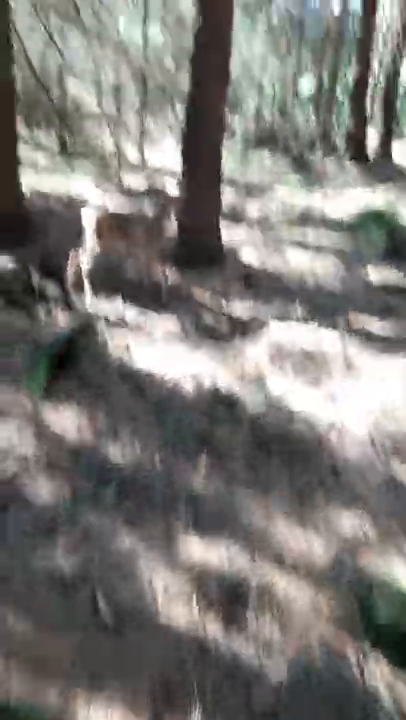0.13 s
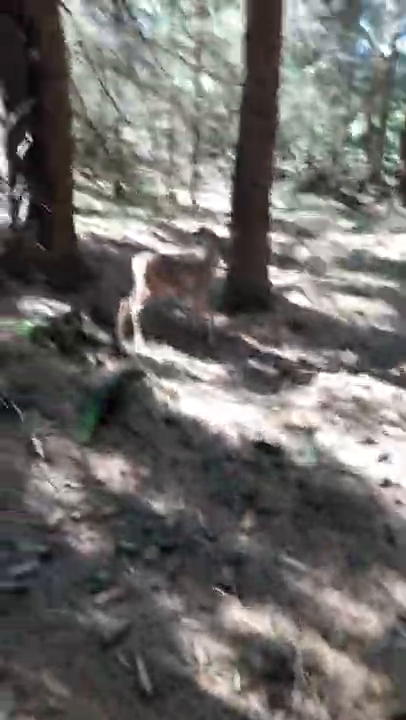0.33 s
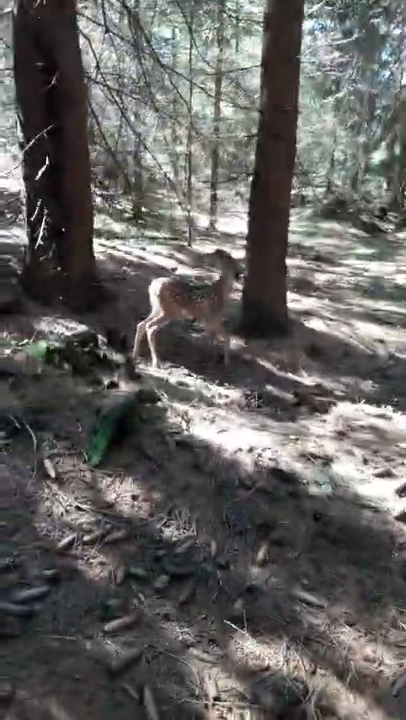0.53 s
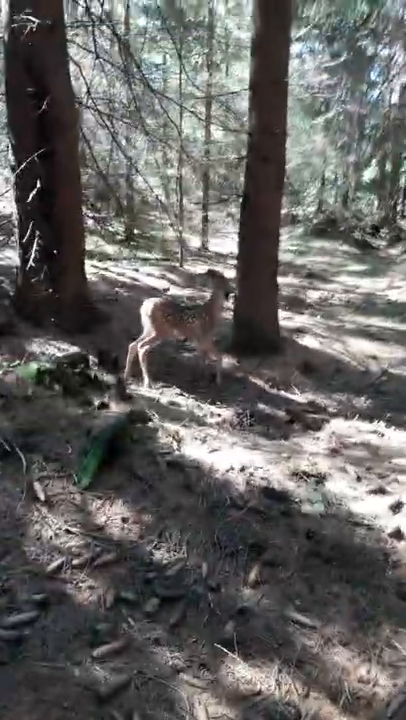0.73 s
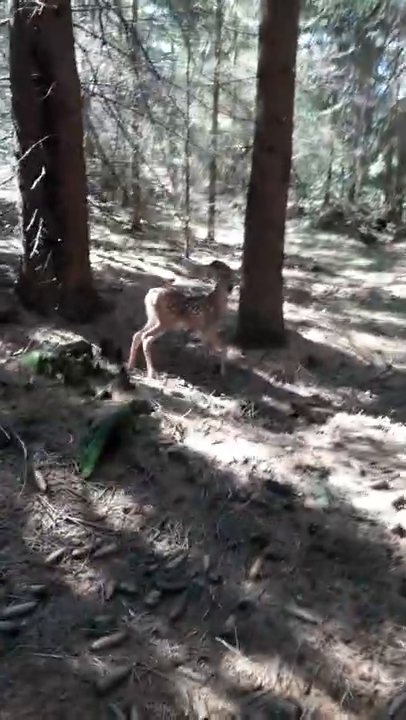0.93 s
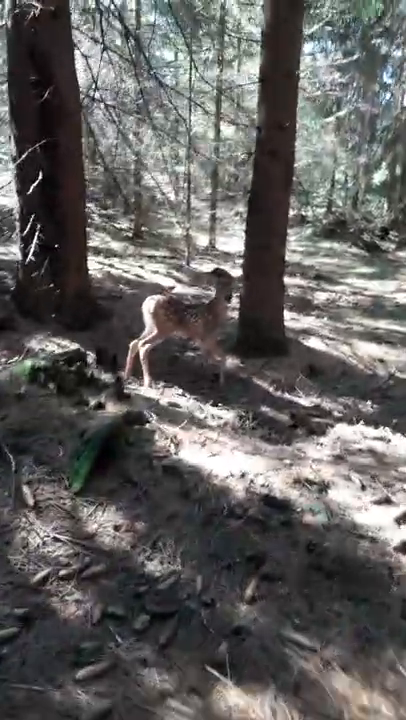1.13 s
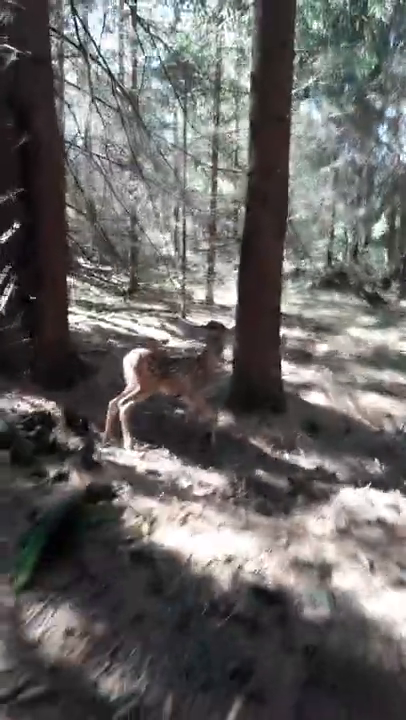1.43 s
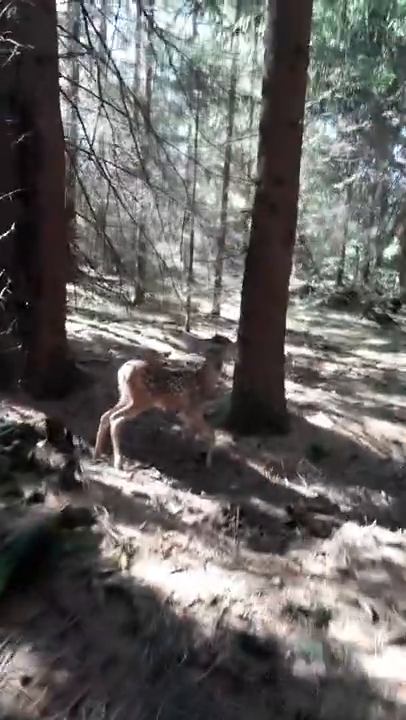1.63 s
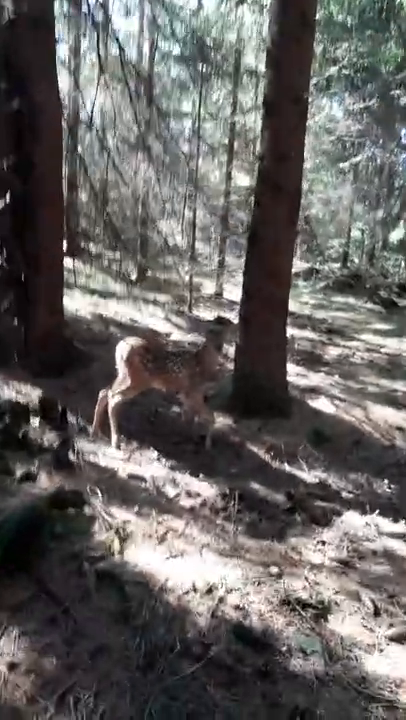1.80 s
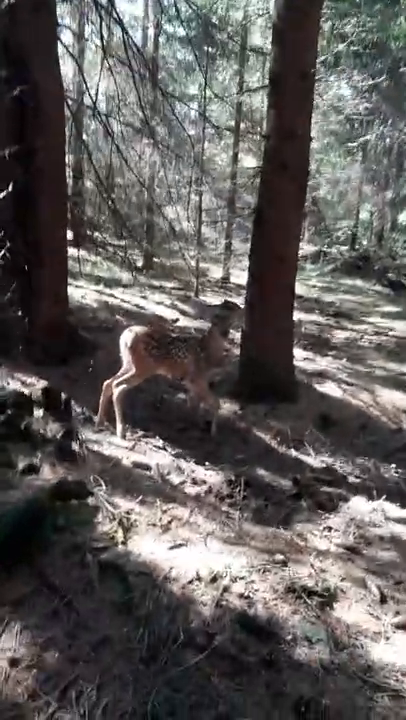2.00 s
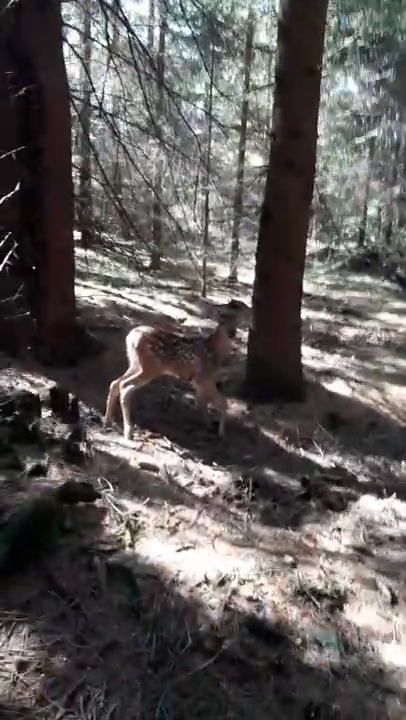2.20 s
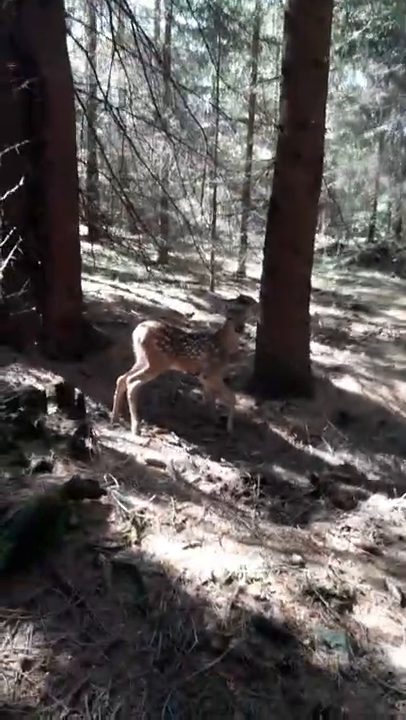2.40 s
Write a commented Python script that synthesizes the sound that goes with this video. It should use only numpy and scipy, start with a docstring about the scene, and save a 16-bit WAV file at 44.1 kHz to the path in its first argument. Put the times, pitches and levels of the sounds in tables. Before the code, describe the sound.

One loud, high, nasal fawn bleat rises and sinks, echoing in quiet woods before faint bird twitter.

```python
"""In a spruce forest a fawn gives one loud, nasal bleat that climbs, holds and sinks, and the trunks echo it.
The bleat stacks gliding harmonics, shaped by the throat, and adds hoarse noise.
Farther off a songbird twitters with short chirps, then whistles in wide swoops: warbling tones with echo.
Close by, dry litter rustles, snaps and gives under soft footfalls: shaped noise.
A very quiet floor of steady noise lies under it all."""
import sys
import numpy as np
from scipy import signal
from scipy.fft import rfft, irfft, next_fast_len
from scipy.io import wavfile
from scipy.ndimage import map_coordinates

SR = 44100
rng = np.random.default_rng(int(sys.argv[2]) if len(sys.argv) > 2 else 0)


def persist_wave(psi):
    """Save psi, clipped to +-1, as 16-bit WAV."""
    counts = np.round(np.clip(psi, -1, 1) * 32767).astype(np.int16)
    wavfile.write(sys.argv[1], SR, np.atleast_2d(counts).T)


N = 112454  # length in samples

# pitch of the bleat: t/s, f/Hz
BLEAT_PITCH = [(.19, 428), (.22, 495.3), (.256, 563), (.282, 621.7), (.305, 648.8), (.336, 670.6),
               (.365, 682.8), (.41, 693.4), (.455, 706.3), (.5, 699.3), (.55, 703.3), (.59, 703.3),
               (.612, 697.2), (.629, 679.8), (.66, 620), (.694, 570.2), (.73, 510), (.756, 456.5),
               (.8, 381.3)]
# effort of the voice, apart from its fundamental: t/s, level/dB
BLEAT_EFFORT = [(.175, -66), (.2, -24.5), (.22, -13), (.255, -6.5), (.32, 1), (.37, -0.5), (.44, 1.5),
                (.52, 6.5), (.63, 0), (.66, 0.5), (.7, -4), (.735, -11), (.755, -23), (.78, -20.5),
                (.81, -39.5)]
# level of a harmonic after throat and muzzle, at 0 dB effort: f/Hz, level/dB
THROAT_LEVEL = [(350, -54.5), (500, -36.5), (600, -29), (700, -24), (950, -21.5), (1170, -19),
                (1310, -20.5), (1400, -35), (1680, -21.5), (1930, -29.5), (2110, -26), (2260, -33),
                (2520, -18.5), (2800, -21.5), (3100, -21.5), (3370, -28), (3560, -25), (3850, -30),
                (4070, -20.5), (4240, -28.5), (4400, -43.5), (4750, -54), (5030, -24), (5600, -42.5),
                (6000, -32.5), (6270, -33.5), (6600, -50), (6850, -62.5), (7050, -45), (7300, -47),
                (8200, -67.5), (8900, -44), (9400, -73), (10550, -64), (11900, -86), (14100, -74),
                (15500, -100)]
# boost or cut of the treble: t/s, level/dB
TREBLE_LEVEL = [(.2, 8.5), (.26, 1.5), (.33, -4), (.4, 1.5), (.5, -7), (.6, -2.5), (.66, -6), (.74, -1)]
TREBLE_FROM_HZ, TREBLE_FULL_HZ = 1300, 6000
# level of the nasal resonance: t/s, level/dB
NASAL_LEVEL = [(.21, 10), (.255, 7), (.3, 21), (.5, -1.5), (.64, -3.5), (.68, -11), (.75, -7.5)]
NASAL_HZ, NASAL_WIDTH_HZ = 1720, 88
# level of the throat's strongest resonance: t/s, level/dB
RING_LEVEL = [(.22, -5.5), (.255, -10.5), (.285, 3), (.34, 2.5), (.39, -0.5), (.46, -1), (.5, 3.5),
              (.55, 3.5), (.585, 2.5), (.62, 11.5), (.65, -1.5), (.73, -1)]
RING_HZ, RING_WIDTH_HZ = 2730, 330
# level of the muzzle's resonance, which fades just before the pitch drops: t/s, level/dB
MUZZLE_LEVEL = [(.22, 7), (.27, 8), (.33, 1), (.45, -2), (.55, -6.5), (.58, -11), (.62, -7.5), (.68, -6),
                (.74, -6)]
MUZZLE_HZ, MUZZLE_WIDTH_HZ = 3510, 220
# level of the thin top resonance, strongest while the call climbs: t/s, level/dB
EDGE_LEVEL = [(.2, -5), (.265, -1.5), (.305, 19.5), (.35, 16), (.42, -3.5), (.5, -8.5), (.62, -1.5),
              (.72, -12.5)]
EDGE_HZ, EDGE_WIDTH_HZ = 7750, 520
# level of the fundamental: t/s, level/dB
FUNDAMENTAL_LEVEL = [(.18, -81.5), (.22, -57.5), (.242, -45.5), (.268, -34.5), (.305, -28.5), (.43, -25),
                     (.6, -24.5), (.65, -25.5), (.694, -34), (.74, -43.5), (.776, -50), (.81, -80)]
# level of the faint undertone against the fundamental: t/s, level/dB
UNDERTONE_LEVEL = [(.24, -54), (.3, -38.5), (.42, -46.5), (.6, -46.5), (.66, -39.5), (.71, -56.5)]
UNDERTONE_BELOW_HZ = 375  # it keeps this far under the pitch
# hoarseness: t/s, amount (0 to 1)
HOARSENESS = [(.19, .55), (.25, 0.277), (.33, 0.052), (.46, 0.026), (.6, 0.012), (.63, 0.028),
              (.66, 0.1324), (.72, 0.21), (.79, 0.39)]
# colour of the hoarse noise: f/Hz, level/dB
RASP_COLOUR = [(30, -92), (150, -78.5), (300, -51), (450, -20), (900, -9.5), (1700, -1.5), (2800, -1.5),
               (4200, 3.5), (6400, -1.5), (6900, -25.5), (8800, -17), (9300, -36.5), (15000, -52.5)]
RASP_DB = -18
# random unsteadiness of pitch (share) and level, both scaled by hoarseness
JITTER, SHIMMER_DB, SHIMMER_FULL_HZ = 0.013, 14.5, 6000
TOP_FLUTTER_DB, TOP_FLUTTER_RATE = 5, 21.04  # slow uneven swell of the highest harmonics; knots a second
DISPERSION = 0.9  # the throat delays harmonic k by this times k squared (radians)

# echoes of ground and trunks: delay t/s, level/dB
TRUNK_ECHOES = [(.013, -17.5), (.031, -25), (.052, -21.5), (.074, -22.5)]
# time for the near and the far echo to fall by 60 dB: f/Hz, t/s
NEAR_DECAY = [(300, 0.084), (1300, 0.56), (3000, .38), (9000, .3)]
FAR_DECAY = [(300, 1.1), (1300, 1.1), (3000, 1), (9000, 0.25)]
# colour of all the bleat's echoes: f/Hz, level/dB
FOREST_COLOUR = [(300, -5), (700, -12), (850, 1.5), (1100, -12), (1350, 0.5), (2800, -3.5), (4200, -2.5),
                 (6500, 7.5), (10000, -4.5)]
NEAR_DB, FAR_DB = -15.5, -25

# twitter, pairs of a falling and a rising chirp: t/s, middle pitch of the first f/Hz, level/dB before the mix
BIRD_TWITTER = [(.775, 4460, -41.5), (.884, 4560, -44), (0.996, 4537, -43.5), (1.105, 4475, -44.5),
                (1.218, 4366, -44.5), (1.33, 4380, -45.5), (1.439, 4067, -46.5), (1.55, 3750, -46.5)]
CHIRP_S, ANSWER_S = .018, .037  # length of a chirp; wait from the first to the second
FALL_OCT, RISE_OCT, ANSWER_RATIO = .48, .42, .94  # sweep widths in octaves; pitch of the second to the first
# running warble, swoops and closing buzz: t/s, f/Hz, level/dB before the mix, warble (share of the pitch)
BIRD_WHISTLE = [(.8, 3933, -56, .1), (1.1, 3750, -53.5, .1), (1.3, 3550, -56.5, .1),
                (1.52, 3168, -53.5, .05), (1.67, 2978, -55, 0.042), (1.7, 2150, -56.5, 0.092),
                (1.735, 2850, -50, 0.058), (1.768, 4880, -47.5, 0.021), (1.81, 4683, -63, .03),
                (1.84, 3145, -47.5, 0.068), (1.862, 2100, -60, 0.056), (1.895, 2389, -51, 0.096),
                (1.935, 4690, -45.5, .03), (1.99, 4580, -58, 0.026), (2.025, 2320, -51, .07),
                (2.065, 2504, -53.5, .07), (2.105, 4577, -44.5, 0.018), (2.17, 4710, -69, 0.049),
                (2.185, 5700, -51.5, 0.097), (2.29, 5400, -47.5, 0.1), (2.34, 4992, -57.5, 0.088),
                (2.37, 4226, -47.5, .04), (2.43, 3168, -51.5, .05), (2.49, 2438, -49.5, .06),
                (2.55, 2144, -58, 0.055)]
CHIRP_WARBLE, WARBLE_RATE = 0.059, 650.5  # share of the pitch; knots a second
# time for the bird's echo to fall by 60 dB: f/Hz, t/s
BIRD_DECAY = [(2000, 0.29), (4000, 0.59), (7000, 0.41)]
BIRD_DRY_DB, BIRD_WET_DB = -4, -3.5

# loudness of the rustle: t/s, level/dB
RUSTLE_LEVEL = [(0, -61.5), (.16, -59), (.25, -63.5), (1.12, -66), (1.17, -57.5), (1.23, -65), (1.31, -64),
                (1.35, -55), (1.55, -54.5), (1.62, -52.5), (1.72, -61), (1.8, -69), (1.88, -67),
                (1.95, -59), (2.05, -79), (2.49, -78), (2.55, -55.5)]
# colour of dry litter: f/Hz, level/dB
LITTER_COLOUR = [(300, -33), (1500, -11.5), (3500, -25), (5400, 6.5), (6500, 9), (7150, -14.5),
                 (7800, -8.5), (8900, -2.5), (9400, -33), (11000, -28.5), (15000, -40.5)]
# snapping twigs: t/s, level/dB before the shared SNAP_DB
TWIG_SNAPS = [(0.0747, -38), (1.3359, -34), (1.5051, -38), (1.5374, -40), (1.9554, -42)]
SNAP_S, SNAP_DB = .02, -9  # time to fall by 60 dB; shared level
# soft footfalls: t/s, half length/s, level/dB
FOOTFALLS = [(1.468, 0.048, -58.5), (1.668, .012, -62)]
# colour of a footfall: f/Hz, level/dB
FOOTFALL_COLOUR = [(400, -17.5), (1000, -14), (1350, -6), (2000, -2.5), (3000, -20), (8000, -38.5)]

# colour of the quiet floor: f/Hz, level/dB
FLOOR_COLOUR = [(25, -13.5), (80, -1.5), (140, -0.5), (250, -9.5), (700, -9.5), (1700, -9), (3000, -11),
                (4500, -4), (6400, 3), (7200, -17.5), (8800, -23.5), (9600, -21.5), (15500, -23)]
FLOOR_DB = -64.5
TOP_HZ = 15650  # band limit of the recorder


def amp(db):
    """Turn decibels into a gain."""
    return 10 ** (np.asarray(db) / 20)


def unit(x):
    """Scale a sound to an average strength (rms) of 1."""
    return x / np.sqrt(np.mean(x ** 2) + 1e-20)


def along(points, hz):
    """Read a table of frequencies and values on a log frequency axis."""
    f, v = np.transpose(points)
    return np.interp(np.log(hz + 1), np.log(f + 1), v)


def clock():
    """Time of each sample in seconds."""
    return np.arange(N) / SR


def curve(rows, axis=1):
    """Draw one column of a timed table as a line through its points."""
    table = np.transpose(rows)
    return np.interp(clock(), table[0], table[axis])


def wobble(rate):
    """A smooth random curve through this many random knots a second."""
    knots = rng.standard_normal(N // 8)
    return map_coordinates(knots, [clock() * rate], mode="wrap")


def filtered(x, response):
    """Multiply each frequency of a sound by its response."""
    m = next_fast_len(N + SR // 2)
    hz = np.fft.rfftfreq(m, 1 / SR)
    return irfft(rfft(x, m) * response(hz), m)[:N]


def noise(spectrum):
    """Random hiss with the given colour, scaled to rms 1."""
    hiss = rng.standard_normal(N)
    return unit(filtered(hiss, lambda hz: amp(along(spectrum, hz))))


def echo(x, decay, build_s):
    """Scatter among the trees: it builds up, then each frequency dies at its own speed."""
    hz, t, z = signal.stft(rng.standard_normal(SR), SR, nperseg=256)
    fade = amp(-60 * t / along(decay, hz)[:, None])
    build = 1 - np.exp(-t / build_s)
    tail = signal.istft(z * fade * build, SR, nperseg=256)[1]
    return signal.fftconvolve(x, tail / np.linalg.norm(tail))[:N]


def bleat():
    """One voice pitch drives the fundamental, overtones and hoarse noise of the call."""
    rough = np.abs(curve(HOARSENESS))
    pitch = curve(BLEAT_PITCH) * (1 + JITTER * rough * wobble(300))
    phase = 2 * np.pi * np.cumsum(pitch) / SR
    voice = rasp(phase, rough) + overtones(pitch, phase, rough)
    call = fundamental(phase) + voice * amp(curve(BLEAT_EFFORT))
    sounding = (clock() > BLEAT_EFFORT[0][0]) * (clock() < BLEAT_EFFORT[-1][0])
    return call * sounding


def overtones(pitch, phase, rough):
    """Harmonics glide through the throat's resonances; the upper ones waver most where the call is hoarse."""
    treble = curve(TREBLE_LEVEL)
    resonances = [(curve(NASAL_LEVEL), NASAL_HZ, NASAL_WIDTH_HZ),
                  (curve(RING_LEVEL), RING_HZ, RING_WIDTH_HZ),
                  (curve(MUZZLE_LEVEL), MUZZLE_HZ, MUZZLE_WIDTH_HZ),
                  (curve(EDGE_LEVEL), EDGE_HZ, EDGE_WIDTH_HZ)]
    total = np.zeros(N)
    for k in range(2, 23):
        hz = k * pitch
        height = np.minimum(hz / SHIMMER_FULL_HZ, 1)
        db = along(THROAT_LEVEL, hz)
        for level, centre, width in resonances:
            db += level * np.exp(-((hz - centre) / width) ** 4)
        db += treble * np.interp(hz, [TREBLE_FROM_HZ, TREBLE_FULL_HZ], [0, 1])
        db += SHIMMER_DB * rough * height * np.tanh(wobble(200))
        db += TOP_FLUTTER_DB * height ** 2 * wobble(TOP_FLUTTER_RATE)
        total += np.sqrt(2) * amp(db) * np.sin(k * phase - DISPERSION * k * k)
    return total


def rasp(phase, rough):
    """Hoarse noise that swells and sinks once in each cycle of the voice."""
    return amp(RASP_DB) * rough * noise(RASP_COLOUR) * (1 + .5 * np.cos(phase))


def fundamental(phase):
    """The voice's lowest harmonic, with a faint undertone a fixed number of hertz below it."""
    undertone = np.sin(phase - 2 * np.pi * UNDERTONE_BELOW_HZ * clock())
    tones = np.sin(phase) + amp(curve(UNDERTONE_LEVEL)) * undertone
    return np.sqrt(2) * amp(curve(FUNDAMENTAL_LEVEL)) * tones


def forest(x):
    """A few distinct reflections, a dense near echo and a faint long one."""
    trunks = sum(amp(db) * np.interp(clock() - s, clock(), x, left=0) for s, db in TRUNK_ECHOES)
    near = amp(NEAR_DB) * echo(x, NEAR_DECAY, build_s=0.01)
    far = amp(FAR_DB) * echo(x, FAR_DECAY, build_s=0.038)
    return filtered(trunks + near + far, lambda hz: amp(along(FOREST_COLOUR, hz)))


def bird():
    """A distant songbird: whistled tones and chirps, blended with their echo among the trees."""
    song = amp(curve(BIRD_WHISTLE, axis=2)) * whistle(curve(BIRD_WHISTLE), curve(BIRD_WHISTLE, axis=3))
    song *= clock() > BIRD_WHISTLE[0][0]
    for s, hz, db in BIRD_TWITTER:
        falling = chirp(s, hz, -FALL_OCT)
        rising = chirp(s + ANSWER_S, hz * ANSWER_RATIO, RISE_OCT)
        song += amp(db) * (falling + rising)
    return amp(BIRD_DRY_DB) * song + amp(BIRD_WET_DB) * echo(song, BIRD_DECAY, build_s=0.0077)


def whistle(hz, warble):
    """A pure tone of rms 1 whose pitch wavers quickly and unevenly."""
    wavering = hz * (1 + warble * wobble(WARBLE_RATE))
    return np.sqrt(2) * np.sin(2 * np.pi * np.cumsum(wavering) / SR)


def chirp(start, hz, octaves):
    """One short whistle that sweeps in pitch while it swells and fades."""
    progress = np.clip((clock() - start) / CHIRP_S, 0, 1)
    sweep = hz * 2 ** (octaves * (progress - .5))
    return np.sin(np.pi * progress) * whistle(sweep, CHIRP_WARBLE)


def litter():
    """Dry needles rustle as grainy noise, twigs snap in fast-fading bursts, footfalls swell softly."""
    t = clock()
    grains = amp(3 * wobble(350))
    rustle = amp(curve(RUSTLE_LEVEL)) * unit(grains * noise(LITTER_COLOUR))
    bursts = sum(amp(db + SNAP_DB - 60 * np.abs(t - s) / SNAP_S) * (t >= s) for s, db in TWIG_SNAPS)
    swells = sum(amp(db) / (1 + ((t - s) / half) ** 2) for s, half, db in FOOTFALLS)
    return rustle + bursts * noise(LITTER_COLOUR) + swells * noise(FOOTFALL_COLOUR)


def still_air():
    """The quiet floor of the forest: steady coloured noise."""
    return amp(FLOOR_DB) * noise(FLOOR_COLOUR)


def scene():
    """Fawn and its echoes, bird and litter over the still air of the forest."""
    call = bleat()
    return (call + forest(call) + bird() + litter() + still_air())[None]


def record(dry):
    """The recorder keeps nothing above its band limit."""
    return filtered(dry[0], lambda hz: hz < TOP_HZ)[None]


dry = scene()
out = record(dry)
persist_wave(out)
```